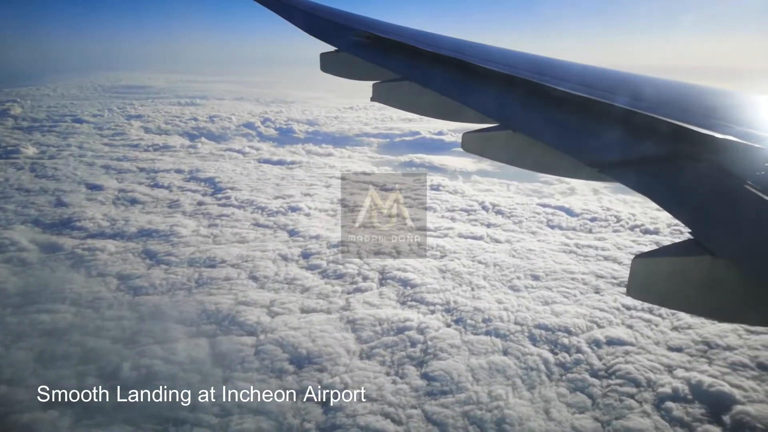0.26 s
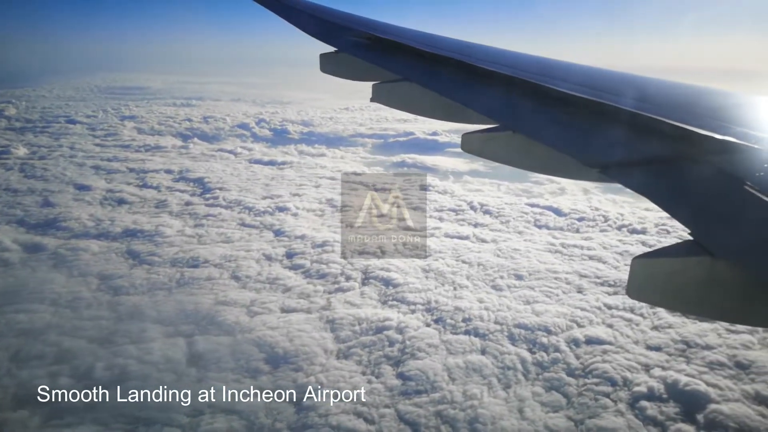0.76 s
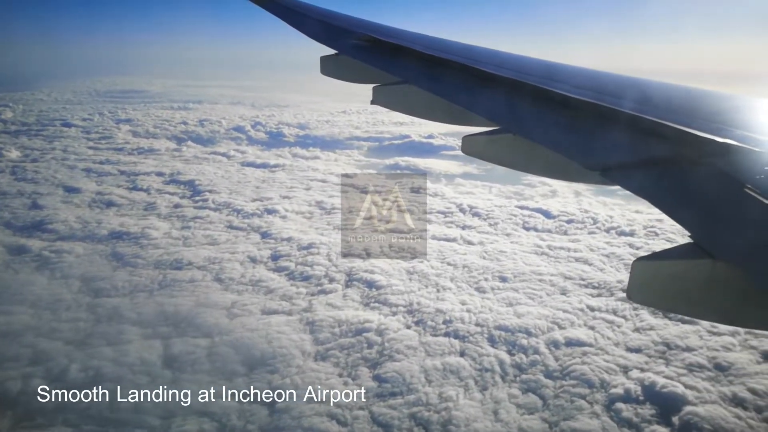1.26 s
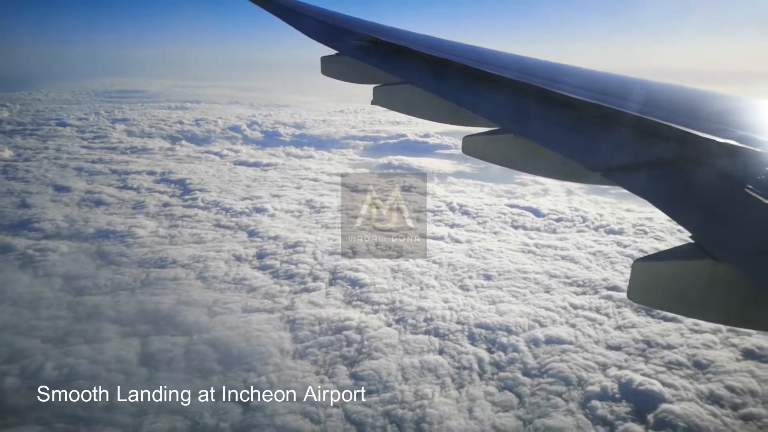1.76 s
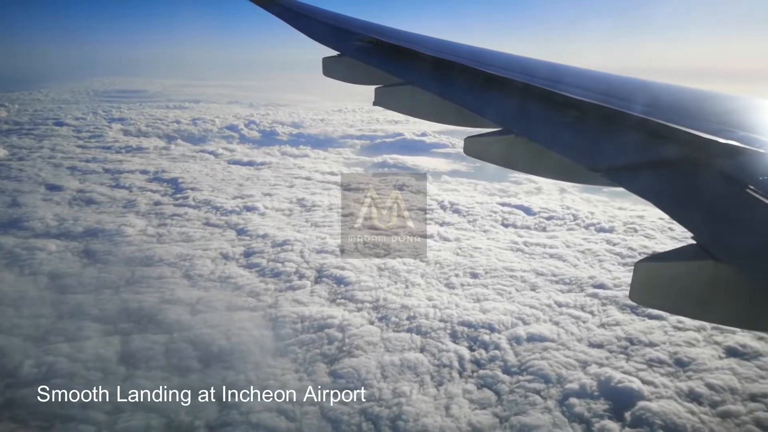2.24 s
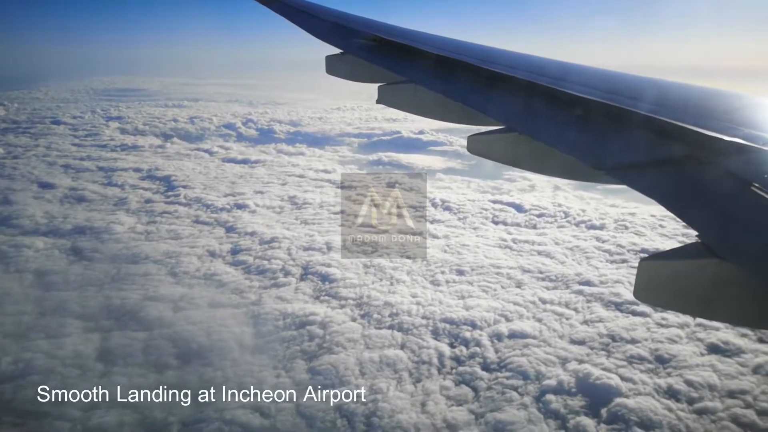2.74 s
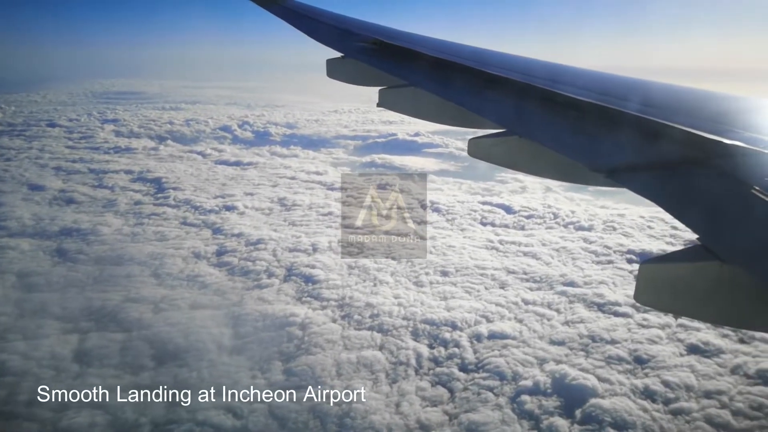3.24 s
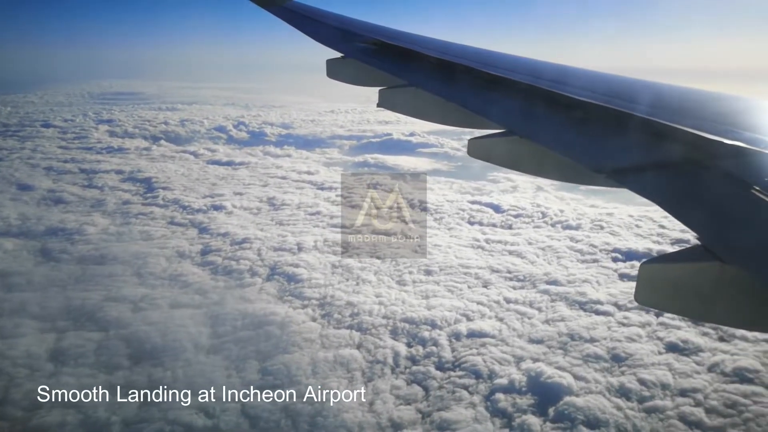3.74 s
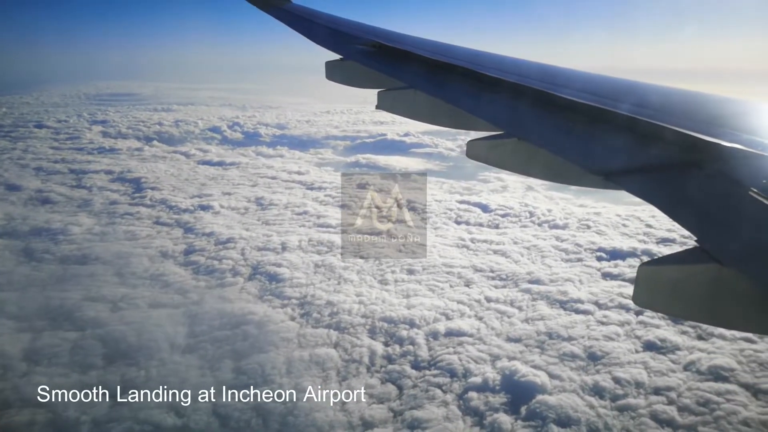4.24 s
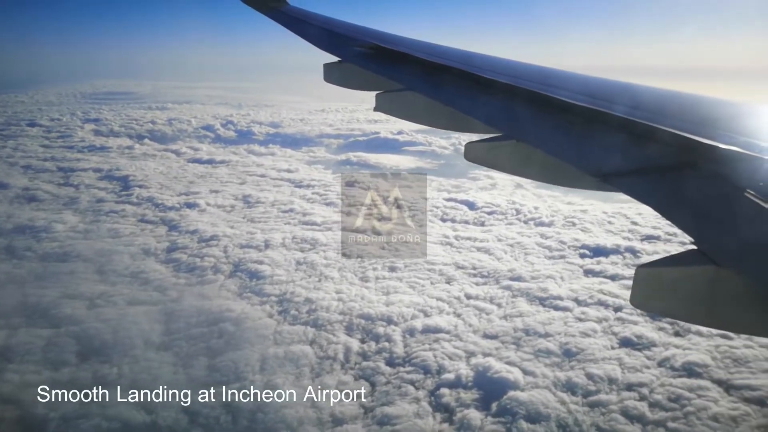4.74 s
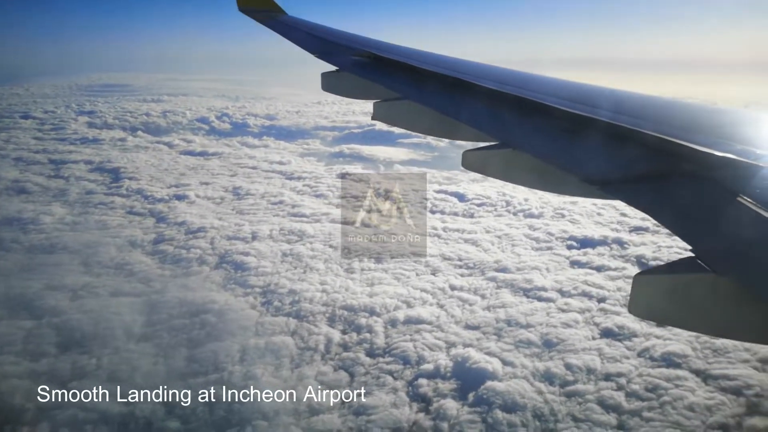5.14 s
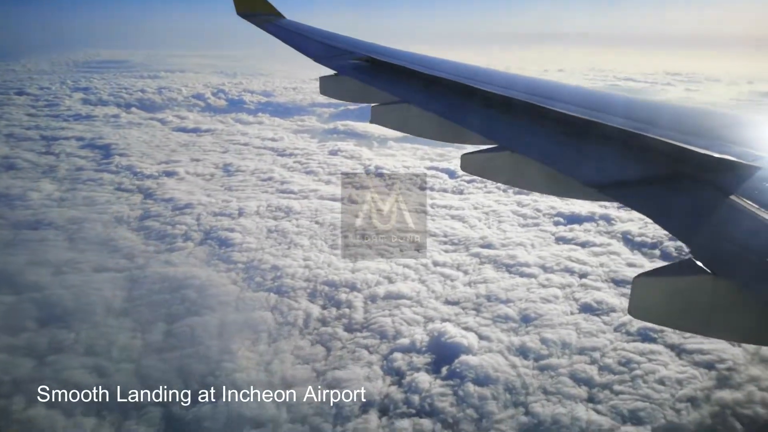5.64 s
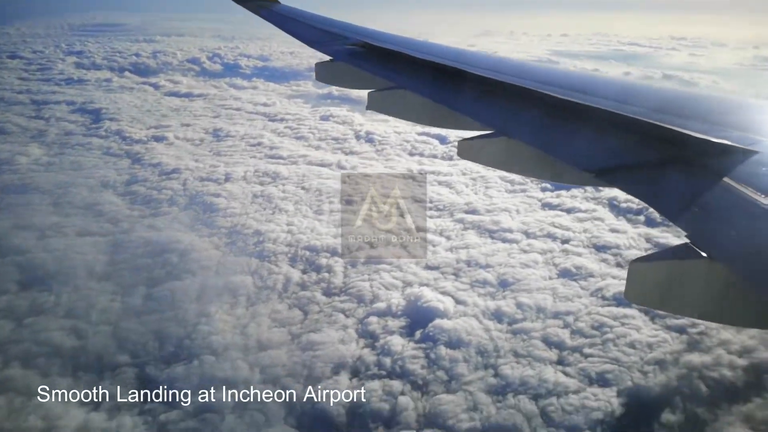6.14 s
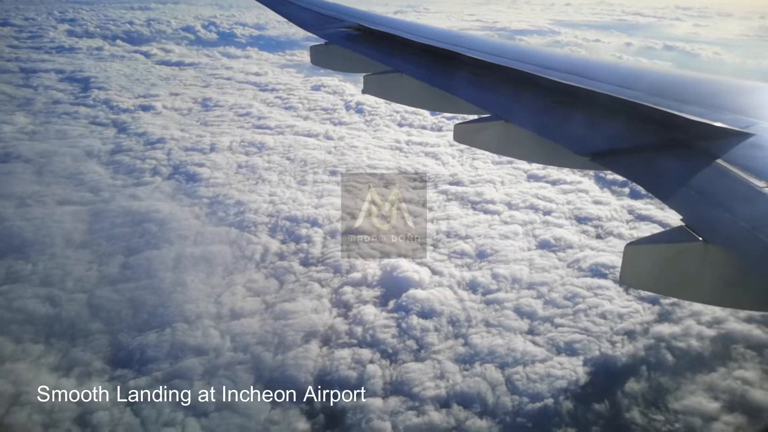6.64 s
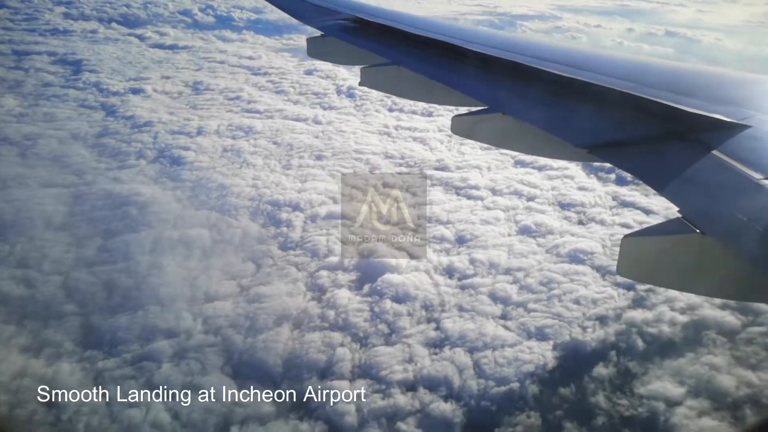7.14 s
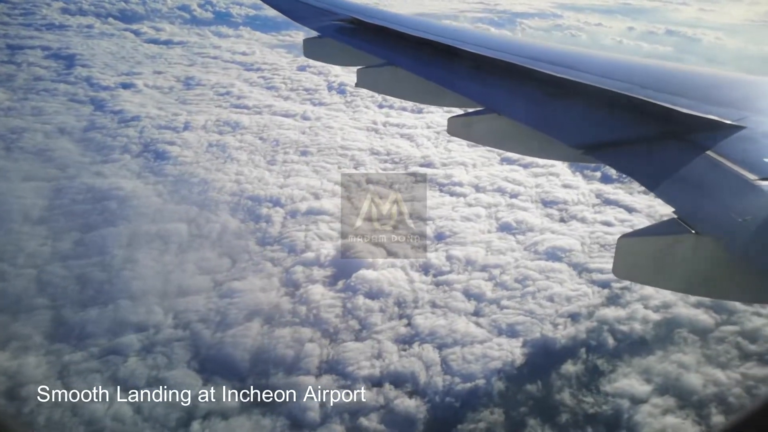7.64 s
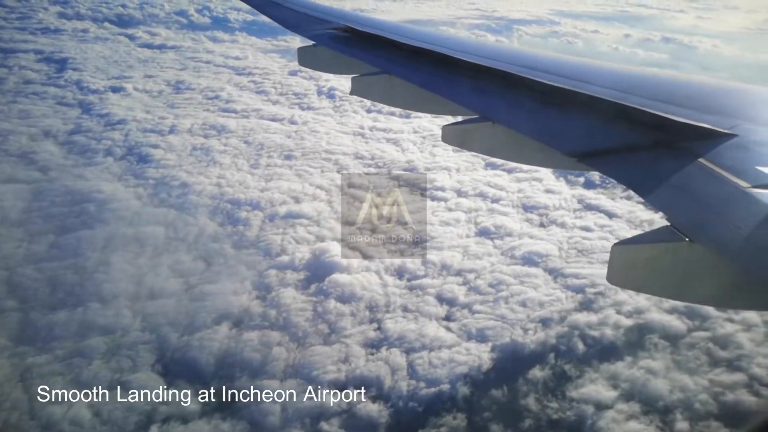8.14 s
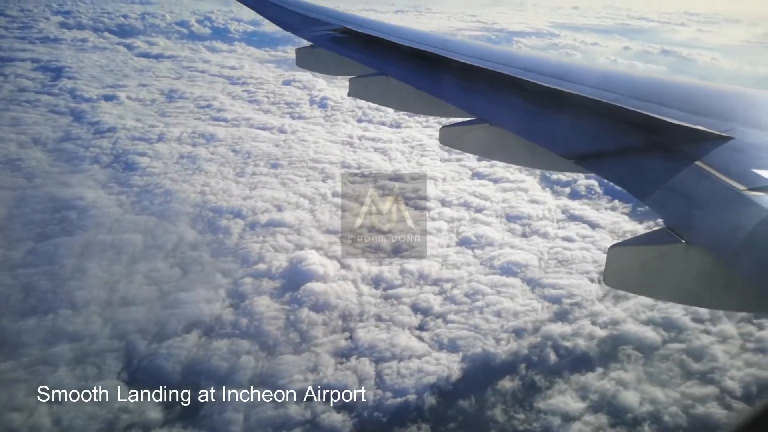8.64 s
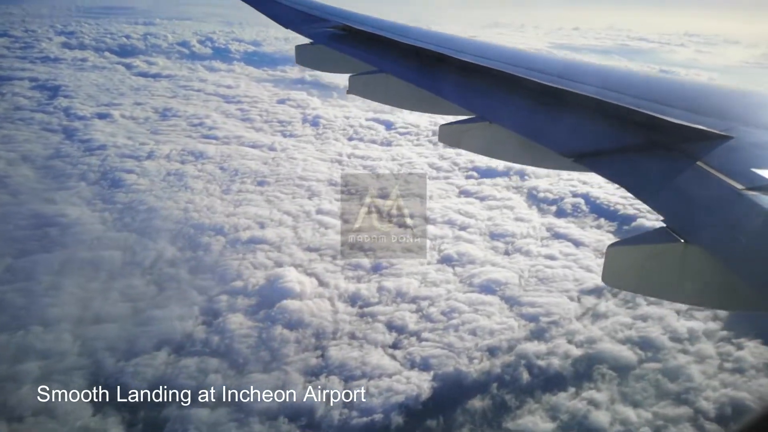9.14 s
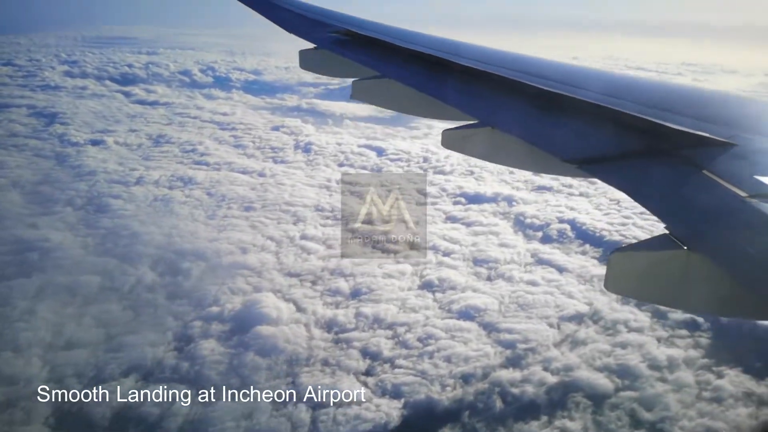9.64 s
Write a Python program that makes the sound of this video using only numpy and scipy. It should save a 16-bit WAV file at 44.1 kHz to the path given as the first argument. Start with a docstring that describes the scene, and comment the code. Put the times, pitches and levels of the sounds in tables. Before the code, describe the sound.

Constant low jet drone heard inside a cruising plane beside the window, soft air rush far beneath it, sparse faint clicks and rustles.

```python
"""Engine and fuselage rumble, with two broad humps, fills an airliner cabin in cruise beside a wing window.
It is low-passed noise whose bands keep shifting phase between the two channels.
Air along the skin and out of the vents gives a much fainter hiss: coloured noise with resonances and flicker.
Small ticks of trim or cloth come and go: short puffs of noise, each with one narrow ring."""
import sys
import numpy as np
from scipy import signal
from scipy.fft import rfft, irfft, next_fast_len
from scipy.io import wavfile
from scipy.ndimage import uniform_filter1d

SR = 44100
rng = np.random.default_rng(int(sys.argv[2]) if len(sys.argv) > 2 else 0)


def file_out(sig):
    """Save sig as 16-bit WAV at sys.argv[1]."""
    # one column per channel
    cols = np.atleast_2d(sig).T
    # limit, then scale
    lim = np.clip(cols, -1, 1)
    pcm = np.round(lim * 32767).astype(np.int16)
    wavfile.write(sys.argv[1], SR, pcm)


N = 436149

# Engine and fuselage rumble. Each row: frequency in Hz, density in dB per Hz, left minus right in dB.
RUMBLE_SPECTRUM = [(6, -45, -0.5), (20, -37.5, -1), (34, -29.5, 1.5), (57.6, -36.5, -1),
                   (93.5, -41.5, -1.5), (139.1, -33.5, 0.5), (200.6, -39.5, 0.5), (253.2, -49, -1),
                   (277, -53, 1.5), (339.5, -54, 2), (401.4, -61.5, 2), (450, -67, 3.5)]
# Rumble independent in each channel. Each row: frequency in Hz, level relative to the rumble in dB.
DIFFUSE_RUMBLE = [(30, -25), (140, -20.5), (220, -13.5), (280, -9.5), (400, -7)]
# Left-right phase angle of the deep hump, held until the next row. Each row: start in s, angle in degrees.
DEEP_ANGLES = [(0.0, -144.0), (0.04, 87), (0.2, -122.0), (0.28, 139), (0.33, -64), (0.64, 151),
               (0.82, -132.0), (0.87, 87), (1.05, -99.0), (1.12, 117), (1.24, -10), (1.28, -116.0),
               (1.41, 55), (1.5, 177), (1.54, 66), (1.58, -122.0), (2.01, 69), (2.12, -132.0), (2.32, -76),
               (2.4, 174), (2.69, -121.0), (2.94, -149.0), (3.28, 4.5), (3.72, -126.0), (3.78, 136.0),
               (3.82, -98), (4.41, 151), (4.45, -113.0), (4.57, 112), (4.71, -93), (4.85, 148), (4.94, -95),
               (4.99, 69), (5.05, 156), (5.13, -21), (5.23, -83), (5.53, 162), (5.6, -133.0), (5.64, -23.5),
               (5.71, -126.0), (5.86, 11), (5.94, 154), (6.06, -10), (6.34, 172), (6.64, -34),
               (6.69, -178.0), (6.79, 129), (6.87, 155), (7.18, 101), (7.52, -35), (7.73, 148.5),
               (8.02, 169), (8.07, 151), (8.35, 83.5), (8.85, 48), (8.99, -103.0), (9.15, 125),
               (9.27, -19.5), (9.43, 139.5), (9.64, -99.0), (9.79, -176.0)]
# Same for the upper hump. Each row: start in s, angle in degrees.
UPPER_ANGLES = [(0.0, 110.5), (0.091, -125.0), (0.241, 142.5), (0.319, -37), (0.599, -156.0), (0.648, -77),
                (0.87, 102), (1.101, 148.5), (1.251, -67.5), (1.4, 89.5), (1.56, -134.0), (1.72, -4),
                (1.76, -114.0), (1.97, 97), (2.119, -125.0), (2.319, 107), (2.4, -66), (2.472, -148.0),
                (2.55, 12.5), (2.6, -55), (2.67, -112.0), (3.12, -15.5), (3.186, 137.5), (3.28, -65),
                (3.32, 23), (3.72, -70), (4.0, -124.0), (4.131, 165), (4.19, -62), (4.298, -101.0),
                (4.551, 164), (4.649, -73.5), (4.98, 153.5), (5.09, -2.5), (5.23, -56), (5.44, 60),
                (5.49, -105.0), (5.659, 97), (5.72, -106.0), (5.82, 95.5), (5.94, -99.0), (6.051, 0),
                (6.251, -168.0), (6.499, -30), (6.59, 130), (6.63, -2.5), (6.671, 170), (6.79, 107),
                (6.868, 168), (7.047, 43.5), (7.09, 134.5), (7.211, -22.0), (7.31, 117), (7.59, -98),
                (7.63, -17), (7.729, 172), (7.871, 116), (7.92, -14.5), (8.008, 173.5), (8.088, -69),
                (8.14, 41), (8.2, 177.5), (8.32, 119), (8.38, 99.5), (8.684, -110.0), (8.739, 136),
                (8.82, 54), (8.98, -89), (9.08, 153.5), (9.212, -6), (9.42, 183.5), (9.61, -88.5),
                (9.779, -172.0), (9.821, 79), (9.849, 24)]
# Same for the shoulder above the humps. Each row: start in s, angle in degrees.
SHOULDER_ANGLES = [(0.0, -107), (0.25, 161.5), (0.32, -34.5), (0.562, 153.5), (0.649, -78), (0.86, 26.5),
                   (0.92, 132.5), (1.24, -53.5), (1.41, 74), (1.59, -171), (1.7, -108), (1.84, 13),
                   (1.89, -117), (1.961, 68), (2.13, -127), (2.32, 125.5), (2.408, -74), (2.46, -3),
                   (2.59, -123), (2.63, 37), (2.69, -29.5), (2.85, -124), (3.07, -38), (3.19, 152),
                   (3.24, -81), (3.31, 69), (3.46, -20.5), (3.53, 45.5), (3.73, -64.5), (3.99, -114),
                   (4.11, 164.5), (4.18, -4), (4.31, -97.5), (4.44, 29.5), (4.48, -82), (4.568, 159),
                   (4.63, -59.5), (4.88, -153), (4.97, 137), (5.12, -22.5), (5.45, 100.5), (5.49, -83),
                   (5.82, 122), (5.9, -96), (6.09, 5), (6.312, -167), (6.49, -50.5), (6.62, 19),
                   (6.68, -157), (6.78, -33), (6.88, 176.5), (7.052, 2.5), (7.09, 159.5), (7.18, -11.5),
                   (7.34, -148), (7.45, 159), (7.64, -2.5), (7.69, 139), (7.73, -118), (7.83, 110),
                   (7.96, -48.5), (8.11, 31.5), (8.17, -164), (8.32, 110), (8.61, -46.5), (8.65, 150),
                   (8.78, -123), (8.82, 84), (8.97, -76), (9.09, -177), (9.22, -8), (9.27, 80.5),
                   (9.41, -139), (9.64, 32.5), (9.72, -85), (9.8, 50)]
# Rushing air before resonances and flicker. Each row: frequency in Hz, density in dB per Hz,
# left minus right in dB.
AIR_SPECTRUM = [(420, -65.5, 5.5), (473, -72.5, 2), (630, -74, 1), (930, -82, 0.5), (1620, -87.5, -2.5),
                (1950, -86.5, 0), (2490, -90.5, 0.4), (3190, -98.5, 0.4), (4000, -101.2, 1),
                (6460, -104.1, 2), (8300, -109.6, 3.5), (15000, -123.2, -0.7)]
# Peaks and dips in the hiss. Each row: centre in Hz, width in Hz, left lift in dB, right lift in dB.
AIR_RESONANCES = [(751, 44, 6, 5), (866, 53, 2.5, 4.5), (1324, 42, 5, -1), (2660, 62, 4.5, 2.5),
                  (5630, 360, 3, 0.5), (7430, 680, 6, -0.5), (9900, 2400, -1.5, 6), (12000, 2500, -4, 0),
                  (437, 16, 7, -2.5), (1284, 60, -2, -4), (8500, 600, 0.5, -4), (4960, 570, 1.5, -0.5),
                  (13500, 3700, -6, -4)]
# Left-right correlation of the hiss. Each row: frequency in Hz, correlation from -1 to 1.
AIR_CORRELATION = [(300, 0.055), (3000, 0.013), (9000, 0.025), (12000, -0.18), (15000, -.6)]
# Hiss flicker. Each row: frequency in Hz, share of the gusts (dB per dB), shared flicker in dB,
# own flicker in dB, rate of the own flicker in Hz. Flicker is soft-limited.
AIR_FLICKER = [(400, .1, 2, 3, 11), (1510, 2.4, 1.15, 0.5, 10), (4000, 0.98, 1.1, 2, 18),
               (12000, 1.2, 2, -0.5, 15)]
# Gust contour; only departures from its mean are used. Each row: time in s, level in dB.
GUST_LEVELS = [(0.0, -57), (3.93, -57), (4.31, -57), (5.46, -57), (6.08, -56.5), (7.26, -57.5),
               (7.51, -56.5), (8.93, -57.5), (9.8, -56)]
# Ticks and rustles. Each row: nominal time in s, length in s, puff level in dB before the band offsets,
# tilt about 5 kHz in dB per octave, ring frequency in Hz, ring level in dB.
TICK_EVENTS = [(1.248, .027, -70.5, -6, 5200, -76), (1.826, .027, -90, -2, 9450, -66.5),
               (1.888, .027, -68, -5, 5600, -76), (2.607, .03, -75.5, 2.5, 7250, -62.5),
               (2.795, 0.059, -74, -8, 2100, -61), (2.838, .06, -75, -8, 2200, -56),
               (3.047, 0.031, -72.5, -6, 7400, -71), (4.04, .03, -76, 5, 12500, -80),
               (4.379, 0.034, -70, -6, 5200, -68), (4.409, 0.032, -65.5, -9, 5400, -63),
               (4.966, 0.031, -64, 7.5, 10500, -67), (5.025, .03, -76, 2, 7500, -74),
               (5.188, .045, -75.5, 4.5, 7260, -76), (5.834, 0.032, -68, 5, 6200, -65.5),
               (5.953, .02, -72, 1, 7300, -72), (6.635, .035, -74, -1, 4500, -73),
               (6.844, 0.027, -69, -3, 5000, -77), (6.859, 0.035, -67, -7.5, 2600, -65),
               (8.572, 0.041, -73, -6, 2100, -59), (8.799, 0.027, -67, 3, 8000, -70),
               (8.86, .07, -80, -9, 2070, -62), (9.201, 0.035, -57.5, 5.5, 2620, -48.5),
               (9.337, .035, -73.5, 7.5, 9300, -69), (9.395, 0.029, -76, -5, 2100, -63)]
# Bands of every puff. Each row: low edge in Hz, high edge in Hz, offset in dB.
PUFF_BANDS = [(1900, 3100, 3.5), (3480, 5400, 4), (5800, 7300, 0), (8400, 11000, -3.5), (11000, 14000, -15)]

SIZE = next_fast_len(N)
HZ = np.maximum(np.arange(SIZE // 2 + 1) * SR / SIZE, 1)
LEFT_RIGHT = np.array([[1], [-1]])  # opposite signs in the two channels

RUMBLE_TOP_HZ = 425  # rumble below, hiss above
HUMP_SPLIT_HZ, SHOULDER_HZ, EDGE_HZ = 98, 226.8, 305  # splits between the rumble bands
EDGE_JUMPS_PER_S = 9  # mean rate of random phase jumps in the top rumble band
GLIDE_BOX_S = 0.005  # each of three moving averages over a phase jump

TICK_LEAD_S, TICK_BUFFER = 0.010, SR // 5  # start ahead of nominal time; samples per tick
SWELL_POWER = 4.0  # higher is narrower
TAIL_DB, TAIL_DECAY_S = -17.5, 0.034
RAGGED_DB, RAGGED_HZ = 3, 150  # unevenness of the puffs
RING_Q = 9.1
CUTOFF_HZ = 15120


def amp(db):
    """Decibels to amplitude gain."""
    return 10 ** (np.asarray(db) / 20)


def at_hz(rows, hz):
    """Every value column of a spectrum table, interpolated on a log-frequency axis."""
    table_hz, *columns = np.transpose(rows)
    return [np.interp(np.log(hz), np.log(table_hz), column) for column in columns]


def above(edge_hz, order):
    """Power share above a crossover."""
    return 1 / (1 + (edge_hz / HZ) ** order)


def white(channels):
    """Spectrum of white noise at 0 dB per Hz."""
    return rfft(rng.standard_normal((channels, SIZE))) * np.sqrt(SR / 2)


def drift(rate_hz):
    """Slow random signal of unit spread: noise at every 40th sample, twice low-passed."""
    pole = np.exp(-2 * np.pi * rate_hz * 40 / SR)
    noise = rng.standard_normal(N // 40 + 2002)
    slow = signal.lfilter([1], [1, -2 * pole, pole * pole], noise)[2000:]  # drop the filter's onset
    return np.interp(np.arange(N) / 40, np.arange(len(slow)), slow / slow.std())


def limited_drift(rate_hz):
    """Drift soft-limited to within +/-2."""
    return 2 * np.tanh(drift(rate_hz) / 2)


def rumble_angles():
    """Left-right phase of four rumble bands in radians: three from tables, the top one jumping at random."""
    gaps, turns = rng.random((2, 300))
    edge_s = np.cumsum(gaps) * 2 / EDGE_JUMPS_PER_S
    edge_angles = np.transpose([edge_s, 360 * turns])
    t = np.arange(SIZE) / SR
    held = []
    for rows in (DEEP_ANGLES, UPPER_ANGLES, SHOULDER_ANGLES, edge_angles):
        start_s, degrees = np.transpose(rows)
        row = np.searchsorted(start_s, t, side="right") - 1
        held.append(degrees[np.maximum(row, 0)])
    return np.unwrap(np.radians(held))


def rumble():
    """Each band is one noise, phase-turned half its angle forward on the left and back on the right."""
    level_db, balance_db = at_hz(RUMBLE_SPECTRUM, HZ)
    colour = amp(level_db) * np.sqrt(1 - above(RUMBLE_TOP_HZ, order=12))
    diffuse_gain = amp(at_hz(DIFFUSE_RUMBLE, HZ)[0])
    out = irfft(white(channels=2) * colour * diffuse_gain, SIZE)

    edges = [1, above(HUMP_SPLIT_HZ, order=8), above(SHOULDER_HZ, order=16), above(EDGE_HZ, order=16), 0]
    for wave, lower, upper, turn in zip(white(channels=4), edges, edges[1:], rumble_angles() / 2):
        for _ in range(3):  # smooth each jump into a short glide
            turn = uniform_filter1d(turn, int(GLIDE_BOX_S * SR))
        band = wave * colour * np.sqrt(np.maximum(lower - upper, 0))
        in_phase = irfft(band, SIZE)
        quadrature = irfft(1j * band, SIZE)
        out += in_phase * np.cos(turn) + quadrature * np.sin(turn) * LEFT_RIGHT

    balance = amp(balance_db / 2 * LEFT_RIGHT)
    return irfft(rfft(out) * balance, SIZE)[:, :N]


def stereo_noise():
    """Noise spectrum with the channel balance, resonances and correlation of the hiss."""
    lift_db = at_hz(AIR_SPECTRUM, HZ)[1] / 2 * LEFT_RIGHT
    for centre_hz, width_hz, *channel_db in AIR_RESONANCES:
        bell = np.exp(-2 * ((HZ - centre_hz) / width_hz) ** 2)
        lift_db = lift_db + np.outer(channel_db, bell)
    correlation = np.clip(at_hz(AIR_CORRELATION, HZ)[0], -1, 1)
    mid, side = white(channels=2)
    mid = np.sqrt((1 + correlation) / 2) * mid
    side = np.sqrt((1 - correlation) / 2) * side
    return amp(lift_db) * (mid + side * LEFT_RIGHT)


def airflow():
    """Hiss in overlapping octave bands, each following the gusts plus shared and own flicker."""
    colour = amp(at_hz(AIR_SPECTRUM, HZ)[0]) * np.sqrt(above(RUMBLE_TOP_HZ, order=12))
    hiss = stereo_noise() * colour
    gust_db = np.interp(np.arange(N) / SR, *np.transpose(GUST_LEVELS))
    gust_db -= gust_db.mean()
    shared = limited_drift(28)

    out = np.zeros((2, N))
    centres_hz = 350 * 2.0 ** np.arange(7)
    for centre_hz in centres_hz:
        octaves = np.log2(np.maximum(HZ, centres_hz[0]) / centre_hz)
        band = np.cos(np.pi / 2 * np.clip(octaves, -1, 1)) ** 2
        gust_share, shared_db, own_db, own_hz = at_hz(AIR_FLICKER, centre_hz)
        gain_db = gust_share * gust_db + shared_db * shared + own_db * limited_drift(own_hz)
        out += amp(gain_db) * irfft(hiss * band, SIZE)[:, :N]
    return out


def puff(length_s):
    """Envelope of a quick swell peaking at half its length, with a faint exponential tail."""
    t = np.arange(TICK_BUFFER) / SR
    phase = 2 * t / length_s
    swell = (phase * np.exp(1 - phase)) ** SWELL_POWER
    tail = np.minimum(phase, 1) ** SWELL_POWER * np.exp(-t / TAIL_DECAY_S)
    return swell + amp(TAIL_DB) * tail


def tick_span(time_s):
    """Samples covered by one tick, starting ahead of its nominal time."""
    start = int((time_s - TICK_LEAD_S) * SR)
    return slice(start, start + TICK_BUFFER)


def tick_puffs():
    """Ragged band-noise puffs; a positive tilt favours the upper bands."""
    out, noise = np.zeros((2, N)), stereo_noise()
    for low_hz, high_hz, band_db in PUFF_BANDS:
        band_power = above(low_hz, order=20) * (1 - above(high_hz, order=20))
        band = irfft(noise * np.sqrt(band_power), SIZE)[:, :N]
        octaves = np.log2(np.sqrt(low_hz * high_hz) / 5000)
        envelope = np.zeros(N)
        for time_s, length_s, level_db, tilt_db, *_ in TICK_EVENTS:
            gain = amp(level_db + band_db + tilt_db * octaves)
            envelope[tick_span(time_s)] += gain * puff(length_s)
        ragged = amp(RAGGED_DB * drift(RAGGED_HZ))
        out += envelope * ragged * band / band.std()
    return out


def tick_rings():
    """Noise through one narrow resonator per tick, shaped by the tick's puff."""
    out = np.zeros((2, N))
    for time_s, length_s, *_, ring_hz, ring_db in TICK_EVENTS:
        noise = rng.standard_normal((2, TICK_BUFFER))
        ring = signal.lfilter(*signal.iirpeak(ring_hz, RING_Q, fs=SR), noise)
        out[:, tick_span(time_s)] += amp(ring_db) * puff(length_s) * ring / ring.std()
    return out


def scene():
    """Sum of rumble, hiss and ticks."""
    return rumble() + airflow() + tick_puffs() + tick_rings()


def record(dry):
    """Soft saturation with 0.2 dB small-signal gain, then a steep low-pass started in its settled state."""
    low_pass = signal.ellip(12, .5, 70, CUTOFF_HZ, fs=SR, output="sos")  # 0.5 dB ripple, 70 dB stopband
    rounded = 1.218 * np.tanh(dry / 1.19)
    settled = signal.sosfilt_zi(low_pass)[:, None] * rounded[None, :, :1]
    return signal.sosfilt(low_pass, rounded, zi=settled)[0]


dry = scene()
out = record(dry)
file_out(out)
```